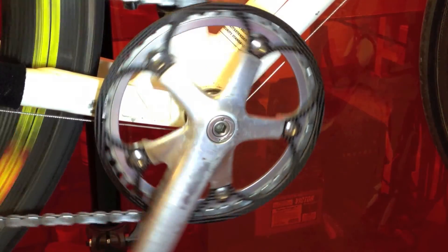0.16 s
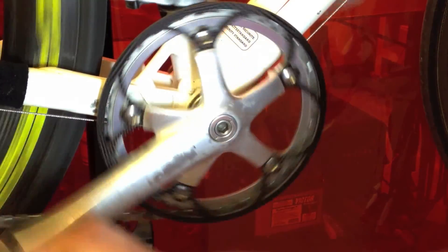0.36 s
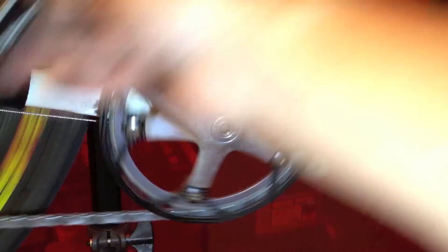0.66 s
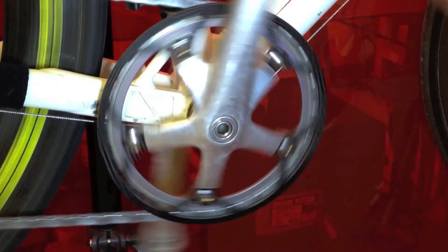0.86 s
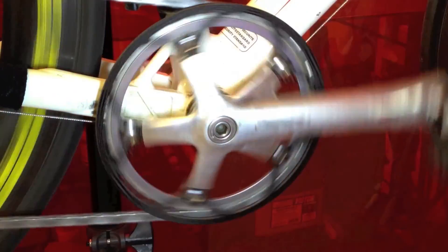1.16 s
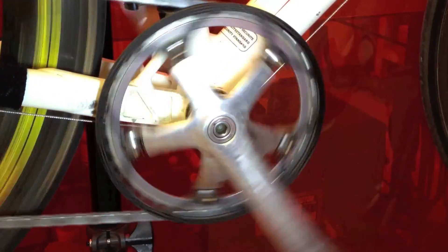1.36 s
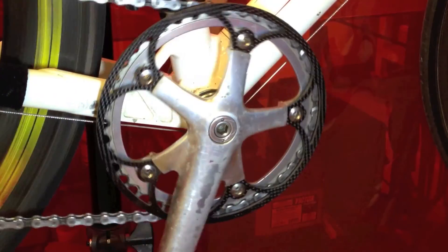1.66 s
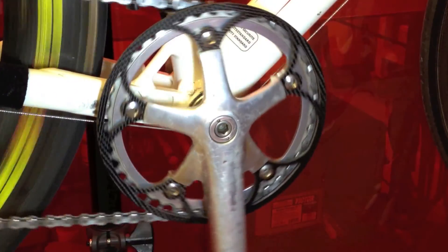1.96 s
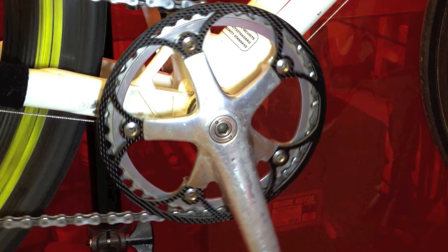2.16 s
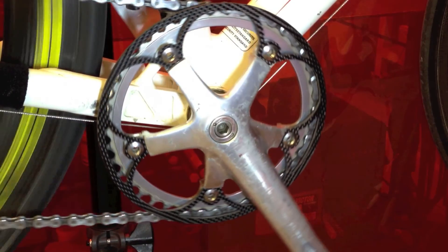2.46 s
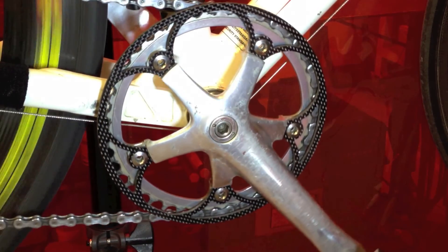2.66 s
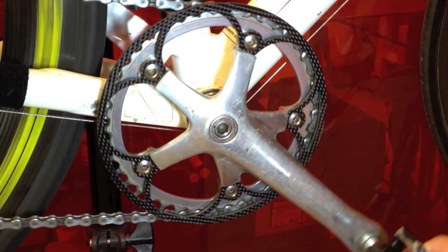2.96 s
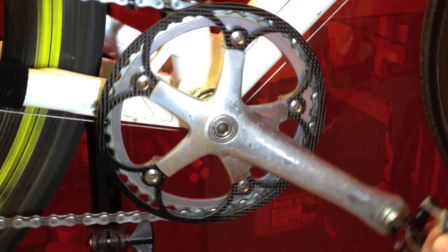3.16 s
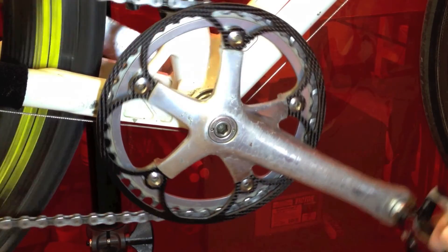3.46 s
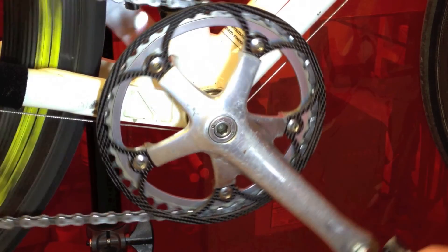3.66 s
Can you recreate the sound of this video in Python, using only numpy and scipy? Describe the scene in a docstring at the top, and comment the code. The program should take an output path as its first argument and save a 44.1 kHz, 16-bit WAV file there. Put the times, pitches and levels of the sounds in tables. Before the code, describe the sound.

Bicycle freewheel, close in a small room. From 0 to 1.5 seconds the hand-cranked chain whirrs quietly with dry, quickening ticks and scattered dull metallic knocks. At about 1.55 the freewheel breaks into much louder, bright, gritty double-edged clicks, about thirty a second, slowing to twenty by 3 seconds; the last straggle at 3.35, 3.44 and 3.64. Short room tail, faint low ventilation rumble and thin hiss throughout.

```python
"""Bicycle freewheel on a stand

In a small room a hand spins the crank; the chain whirrs and ticks over the sprockets, then the freewheel runs free.
At each ratchet tooth two sprung pawls snap down, mostly a few ms apart: gritty noise bursts plus ringing hub modes.
Chain: decaying link ticks on sliding noise, a low whirr, louder knocks. Decaying noise makes the room's tail.
Low ventilation rumble and thin hiss, both steady coloured noise, lie underneath."""
import sys
import numpy as np
from scipy import signal
from scipy.fft import rfft, irfft, next_fast_len
from scipy.io import wavfile
from scipy.ndimage import uniform_filter1d, map_coordinates

SR = 44100
rng = np.random.default_rng(int(sys.argv[2]) if len(sys.argv) > 2 else 0)


def transcribe(signal):
    """Save signal, clipped to [-1, 1], as a 16-bit WAV file at the path in sys.argv[1]."""
    frames = np.atleast_2d(signal).T
    limited = np.clip(frames, -1, 1)
    pcm = np.round(limited * 32767).astype(np.int16)
    wavfile.write(sys.argv[1], SR, pcm)


def boost_factor(decibels):
    """Convert a level in decibels to a linear amplitude factor."""
    exponent = np.asarray(decibels, float) / 20
    return 10 ** exponent


N = 167580  # samples


def unit(x):
    """Scale to rms 1."""
    return x / np.sqrt(np.mean(x ** 2) + 1e-20)


def along(points, hz):
    """Interpolate (f/Hz, value) points on a log frequency axis."""
    f, v = np.transpose(points)
    return np.interp(np.log(hz + 1), np.log(f + 1), v)


def coloured(spectrum, shape):
    """Noise of rms 1 with a (f/Hz, level/dB) spectrum along the last axis."""
    m = next_fast_len(shape[-1])
    z = rfft(rng.standard_normal(shape[:-1] + (m,)))
    gain = boost_factor(along(spectrum, np.fft.rfftfreq(m, 1 / SR)))
    return unit(irfft(z * gain, m)[..., :shape[-1]])


def narrow(hz, share, shape):
    """Rows of noise, rms 1 overall, gathered around hz; share = half-width / hz."""
    off = (np.fft.rfftfreq(shape[1], 1 / SR) - hz) / (share * hz)
    z = rfft(rng.standard_normal(shape))
    return unit(irfft(z / (1 + off ** 2), shape[1]))


def patchy(x, depth_db):
    """Random gain patches, some 700 Hz by 15 ms; result at rms 1."""
    z = signal.stft(x, nperseg=256)[2]
    field = uniform_filter1d(rng.standard_normal(z.shape), size=4, axis=-2)
    field = uniform_filter1d(field, size=5, axis=-1)
    y = signal.istft(z * boost_factor(depth_db * unit(field)), nperseg=256)[1]
    return unit(y[..., :x.shape[-1]])


def wobble(knots_per_s):
    """Smooth random curve through normal-distributed knots."""
    knots = rng.standard_normal(int(N * knots_per_s / SR) + 4)
    return map_coordinates(knots, [np.arange(N) * knots_per_s / SR])


def lay(times_s, rows):
    """Sum one waveform row per time."""
    at = np.round(np.asarray(times_s) * SR).astype(int)[:, None] + np.arange(rows.shape[1])
    return np.bincount(at.ravel(), rows.ravel(), N + SR)[:N]


def dying(t, t60):
    """Exponential decay: 60 dB in t60 seconds."""
    return boost_factor(-60 * t / np.maximum(t60, .001))


# Ventilation spectrum: f/Hz, relative level/dB per Hz
RUMBLE_SPECTRUM = [(25, -53), (70, -27), (95, -24.5), (112, -8), (150, -5.5), (194, 1.5), (240, -1),
                   (300, -2), (360, -6), (385, -1.5), (420, -8.5), (600, -17.5), (850, -22), (1200, -25),
                   (1800, -37.5)]
# Hiss spectrum: f/Hz, relative level/dB per Hz
HISS_SPECTRUM = [(600, -22), (1000, -4), (1600, -6), (4000, 3), (8800, -7), (9600, -28), (11500, -5),
                 (15300, -18), (15500, -40)]
RUMBLE_DB, HISS_DB = -49.5, -74


def background():
    """Ventilation rumble, level drifting slightly, plus steady hiss: coloured noise."""
    rumble = boost_factor(RUMBLE_DB + 0.27 * wobble(5.22)) * coloured(RUMBLE_SPECTRUM, (N,))
    return rumble + boost_factor(HISS_DB) * coloured(HISS_SPECTRUM, (N,))


# Chain run: t/s, relative link level/dB, relative whirr level/dB, link rate/(1/s)
CHAIN_RUN = [(0, -70.5, -65, 31.3), (0.301, -70, -68, 42), (0.549, -68, -62.5, 63), (.66, -64, -60, 55.4),
             (.72, -61, -63, 62), (.82, -60.5, -57, 60), (.92, -62, -59.5, 63), (1.152, -61, -61.5, 66),
             (1.249, -62, -59.5, 72), (1.358, -60.5, -54, 79), (1.462, -63.5, -63.5, 101),
             (1.51, -66, -59, 47), (1.6, -64, -65, 52.4), (2.001, -52, -61, 35), (2.602, -56, -64.5, 47),
             (3.3, -59, -65.5, 40), (3.45, -75, -64, 27), (3.8, -81, -67, 34)]
# Link tick and slide spectrum: f/Hz, relative level/dB per Hz
LINK_SPECTRUM = [(1200, -19), (2400, 2), (3200, -1), (4500, 2.5), (7000, -1.5), (8800, -1.5), (9600, -19),
                 (12000, -6.5), (15300, -10.5), (15500, -40)]
# Low whirr spectrum: f/Hz, relative level/dB per Hz
WHIRR_SPECTRUM = [(400, -33), (600, -4), (1000, -1), (1450, -1.5), (2000, -7), (2600, -8), (4000, -23)]
LINK_SCATTER_DB, LINK_JITTER_LINKS = 3.5, 0.14  # standard deviations
LINK_T60_S, TICK_DB, SLIDE_DB = 0.042, 6.5, -3


def chain():
    """Links seat with dry ticks, nearly in step with chain speed, over sliding hiss and a low whirr."""
    s, link_db, whirr_db, links_per_s = np.transpose(CHAIN_RUN)
    now = np.arange(N) / SR
    links_passed = np.cumsum(np.interp(now, s, links_per_s)) / SR
    draws = rng.standard_normal((300, 2))
    due = np.arange(300) + LINK_JITTER_LINKS * draws[:, 0]
    times = np.interp(due, links_passed, now, right=N / SR)  # links not reached fall past the end
    tick = dying(np.arange(SR // 20) / SR, LINK_T60_S)
    seats = lay(times, boost_factor(LINK_SCATTER_DB * draws[:, 1:]) * tick)

    link_gain = boost_factor(np.interp(now, s, link_db)) * (boost_factor(TICK_DB) * seats + boost_factor(SLIDE_DB))
    links = link_gain * patchy(coloured(LINK_SPECTRUM, (N,)), 2.3)
    whirr_gain = boost_factor(np.interp(now, s, whirr_db) + 1.9 * wobble(29.65))
    whirr_gain = whirr_gain * (1 + 0.96 * seats)  # swells with each seating link
    return links + whirr_gain * patchy(coloured(WHIRR_SPECTRUM, (N,)), 1.6)


# Louder link knocks: t/s, relative level/dB, f/Hz
LINK_KNOCKS = [(0.1162, -38, 2600), (0.178, -41.5, 2400), (0.2533, -41, 4480), (0.3118, -45, 2490),
               (0.3397, -42.5, 2590), (0.3581, -43, 2240), (0.3903, -37.5, 4630), (0.496, -48, 2210),
               (0.5337, -34, 2340), (0.645, -58, 2390), (0.6812, -36, 7300), (0.7307, -41, 3800),
               (0.7764, -39, 2500), (0.839, -44, 4200), (0.902, -50, 2950), (0.9301, -52, 2560),
               (0.9812, -30.5, 6760), (1.2111, -49, 4700)]
# Snap spectrum, for knock puffs and pawls: f/Hz, relative level/dB per Hz
SNAP_SPECTRUM = [(410, -35), (700, -18.5), (1800, -19.5), (2730, -13.5), (3160, -7.5), (5190, -12.5),
                 (6920, 2.5), (9990, -5.5), (14000, -1.5), (15400, -8), (16000, -37)]
KNOCK_T60_S, KNOCK_DB, KNOCK_RING_DB, KNOCK_WIDTH_SHARE = .025, -18, 4, .12


def knocks():
    """Single links seating hard on a tooth: short noise puff plus dull narrow-band ring."""
    s, db, hz = np.transpose(LINK_KNOCKS)
    t = np.arange(SR // 20) / SR
    ring = boost_factor(KNOCK_RING_DB) * narrow(hz[:, None], KNOCK_WIDTH_SHARE, (len(s), len(t)))
    puff = coloured(SNAP_SPECTRUM, ring.shape)
    return lay(s, (puff + ring) * dying(t, KNOCK_T60_S) * boost_factor(db + KNOCK_DB)[:, None])


# Ratchet teeth: t/s, first pawl relative level/dB, lag of second pawl/ms,
# second pawl relative level/dB, gain of the click's body under LOWER_HZ/dB
RATCHET_TEETH = [(1.5449, -23.5, 5.3, -19, 2.2), (1.5964, -20.5, 5.4, -20, 4),
                 (1.6354, -21.5, 2.8, -18, 1.5), (1.6698, -22.0, 1.93, -21, 1.7),
                 (1.7057, -16.5, 1.14, -24, 2.2), (1.7377, -20, 1.08, -19.5, -2),
                 (1.7696, -25, 2.4, -21, 3.5), (1.8011, -30, 2.64, -21, 0.5),
                 (1.8345, -30, 1.1, -19.5, -0.5), (1.8676, -23.5, 4.6, -20, -0.5),
                 (1.9008, -24, 3.2, -21, 0.5), (1.934, -20.5, 2.3, -25.5, 1),
                 (1.9662, -23.5, 3.0, -19, 2.5), (2.0017, -19, 1.0, -45, 2), (2.0355, -41, 1.7, -19, 3.1),
                 (2.0679, -21, 4.1, -23, -1), (2.1058, -22.5, 0.64, -26, -1.5),
                 (2.1432, -26, 3.9, -21.5, 0.1), (2.1824, -25, 4.2, -20, -3),
                 (2.2225, -20.5, 4.2, -24.5, -0.5), (2.2635, -19, 1.27, -19, -2),
                 (2.3056, -17.5, 3.3, -33, 1.5), (2.3469, -20.5, 2, -23, 0.5), (2.387, -27, 2.48, -18, 0.9),
                 (2.4282, -18, 3.86, -30.5, 0.7), (2.4686, -21.5, 6.4, -20.5, 2.5),
                 (2.5141, -20.5, 4.6, -22, -2), (2.5601, -25, 1.08, -20.0, -1.5),
                 (2.608, -19.5, 2.94, -20, -6.5), (2.6586, -49, 0.84, -16, 0.3), (2.71, -21, 1.5, -20, 2),
                 (2.762, -18.5, 4.3, -24.5, 1.5), (2.8134, -23.5, 4.2, -22.5, 3),
                 (2.865, -19, 6.1, -23, 3.2), (2.9173, -20.5, 5.1, -23.0, -0.5),
                 (2.9669, -24, 5.8, -21, -1.3), (3.0202, -21.5, 2.7, -17.5, -6.3),
                 (3.0735, -22, 2.2, -26, -0.5), (3.124, -25, 1.26, -20, 2.5),
                 (3.1738, -22.5, 2.27, -20.5, 2), (3.2263, -17.5, 2.3, -47, 4.5),
                 (3.2808, -17.5, 8.5, -21.5, 3.5), (3.3488, -21.5, 7.8, -22, 4.5),
                 (3.4443, -21, 10.7, -25, 0.5), (3.6416, -18, 13.4, -34, -4)]
# Hub and wheel modes, each a cluster of close ones: f/Hz, relative level/dB, t60/s
HUB_MODES = [(912, -20, 0.17), (1463, -21.5, 0.11), (1680, -23.5, 0.23), (1961, -13.5, 0.15),
             (2095, -7.5, 0.049), (2445, -15.5, 0.14), (2706, -1.5, 0.055), (2950, -20, 0.3),
             (3756, -4.5, 0.075), (4200, -5.5, 0.055), (4765, -1.5, 0.05), (5570, -9, 0.12),
             (6640, -1.5, .04), (8100, 3, 0.047)]
SNAP_T60_S, SNAP_DB, RISE_S = 0.033, -4.5, 0.00078
HUB_DB, MODE_SCATTER_DB, CLUSTER_SHARE, LOWER_HZ = -16, 5, .02, 3400
DETUNE_SHARE = .012  # strike-to-strike sd of a cluster's centre
GRIT_DB, COLOUR_DB = 2.6, 2.8  # chatter within a strike; patches of colour


def freewheel():
    """Each pawl strike: dense ratchet rattle exciting hub modes at new strengths."""
    s, first_db, lag_ms, second_db, lower_db = np.transpose(RATCHET_TEETH)
    times = np.r_[s, s + lag_ms / 1000]
    level_db = np.r_[first_db, second_db]
    lower_db = np.tile(lower_db, 2)
    count = len(times)
    t = np.arange(SR // 6) / SR

    chatter = uniform_filter1d(rng.standard_normal((count, len(t))), size=30)
    grit = boost_factor(GRIT_DB * unit(chatter))
    snap = patchy(coloured(SNAP_SPECTRUM, grit.shape), COLOUR_DB)
    hits = grit * snap * dying(t, SNAP_T60_S)
    below = np.fft.rfftfreq(len(t), 1 / SR) < LOWER_HZ
    hits = irfft(rfft(hits) * boost_factor(lower_db[:, None] * below), len(t))

    for hz, db, t60_s in HUB_MODES:
        size_db = MODE_SCATTER_DB * (2 * rng.random(count) - 1) + lower_db * (hz < LOWER_HZ)
        centre_hz = hz * (1 + DETUNE_SHARE * rng.standard_normal((count, 1)))
        cluster = narrow(centre_hz, CLUSTER_SHARE, hits.shape)
        hits = hits + boost_factor(HUB_DB + db + size_db)[:, None] * dying(t, t60_s) * cluster
    onset = 1 - np.exp(-t / RISE_S)
    return lay(times, hits * onset * boost_factor(level_db + SNAP_DB)[:, None])


# Room decay: f/Hz, t60/s
ROOM_DECAY = [(500, 0.37), (3000, 0.35), (8000, 0.31), (15200, 0.31), (15600, 0.084)]
ROOM_DB, ROOM_DELAY_S = -10, .004


def room(x):
    """Diffuse tail: noise decaying at its own speed per frequency, redrawn every 1/20 s."""
    out, step = np.zeros(N + SR), SR // 20
    for start in range(0, N, step):
        hz, t, z = signal.stft(rng.standard_normal(SR // 3), SR, nperseg=256)
        decay = dying(t, along(ROOM_DECAY, hz)[:, None])
        tail = signal.istft(z * decay, SR, nperseg=256)[1]
        wet = signal.fftconvolve(x[start:start + step], tail / np.linalg.norm(tail))
        out[start + round(ROOM_DELAY_S * SR):][:len(wet)] += wet
    return out[:N]


def scene():
    """Bicycle and its room tail over the background; one channel."""
    bike = freewheel() + chain() + knocks()
    return (bike + boost_factor(ROOM_DB) * room(bike) + background())[None]


def band_limit(x):
    """A steep low-pass at the top of the band."""
    return signal.sosfilt(signal.butter(12, 16470, fs=SR, output="sos"), x)


TOP_HZ, SHELF_HZ, SHELF_DB = 16600, 15400, -20


def record(dry):
    """Step the treble down over the 150 Hz below SHELF_HZ; cut from TOP_HZ up."""
    m = next_fast_len(N + 4096)
    hz = np.fft.rfftfreq(m, 1 / SR)
    shelf = boost_factor(SHELF_DB * np.clip((hz - SHELF_HZ) / 150 + 1, 0, 1))
    mix = irfft(rfft(dry, m) * shelf * (hz < TOP_HZ), m)[:, :N]
    return band_limit(mix)


dry = scene()
out = record(dry)
transcribe(out)
```